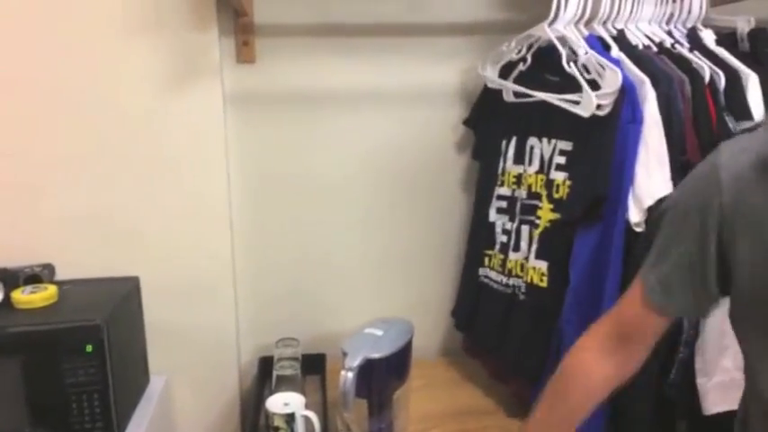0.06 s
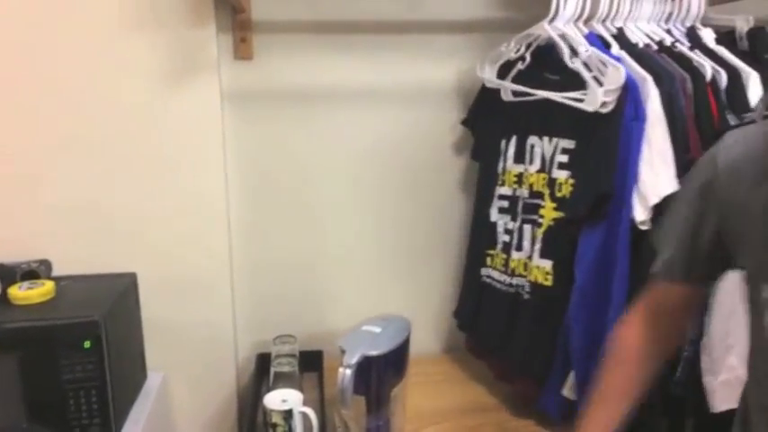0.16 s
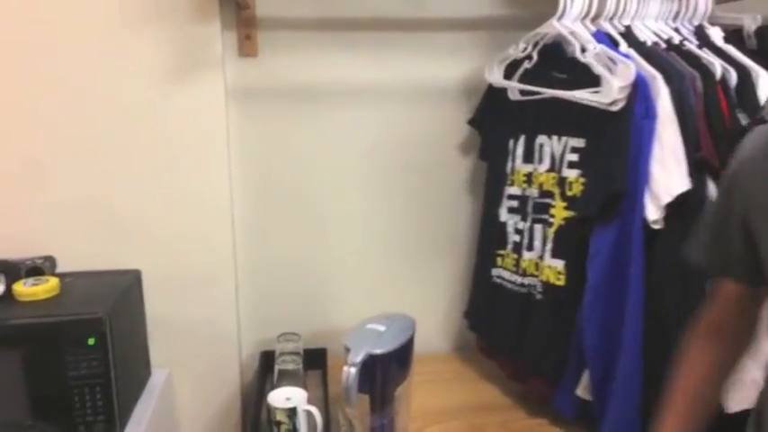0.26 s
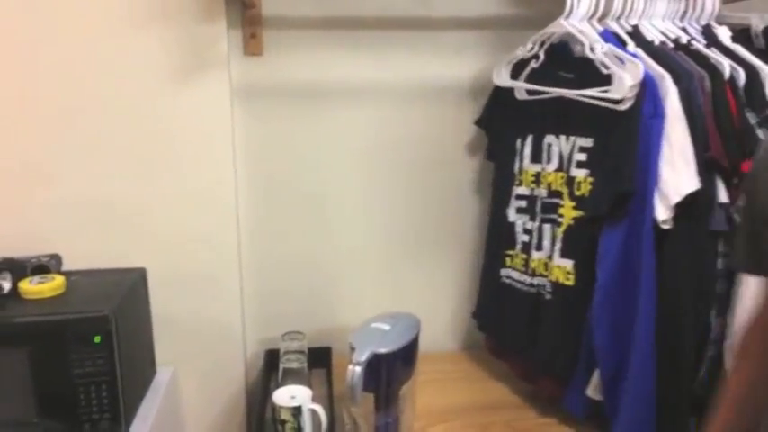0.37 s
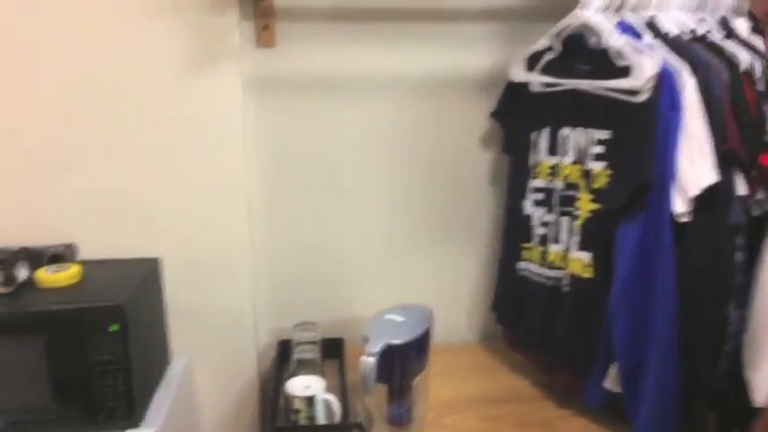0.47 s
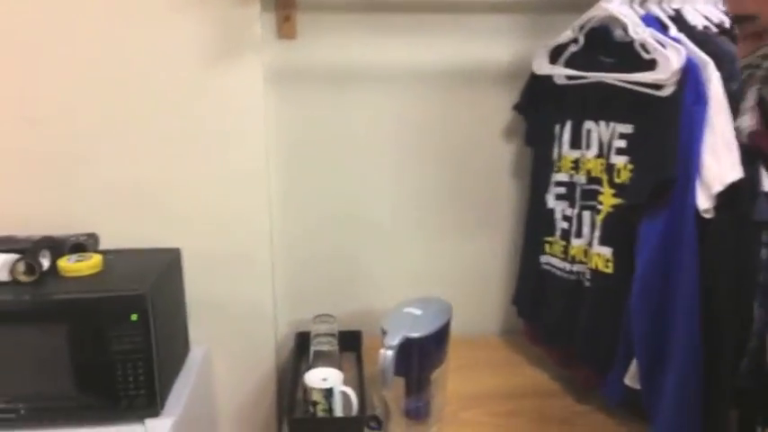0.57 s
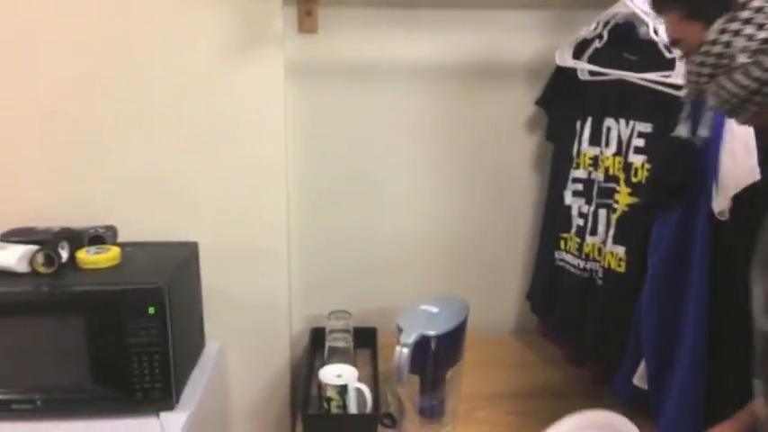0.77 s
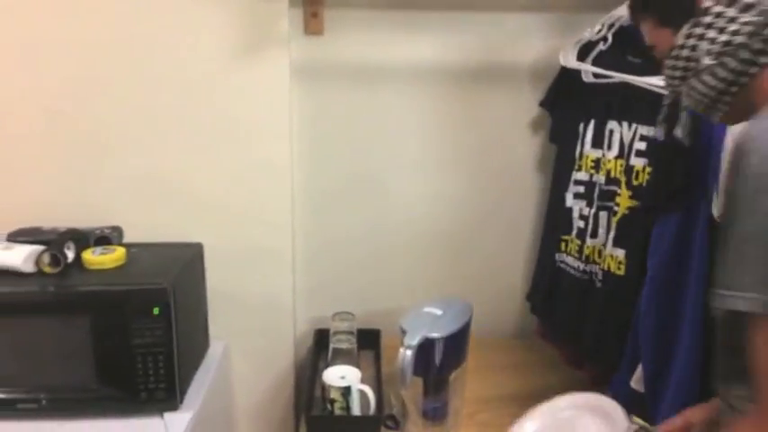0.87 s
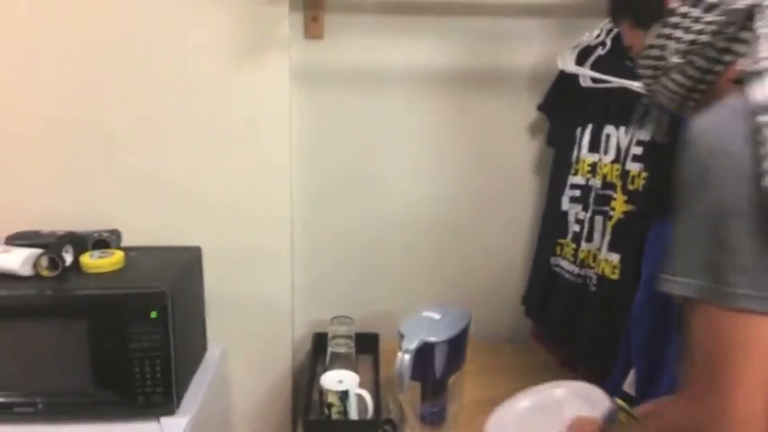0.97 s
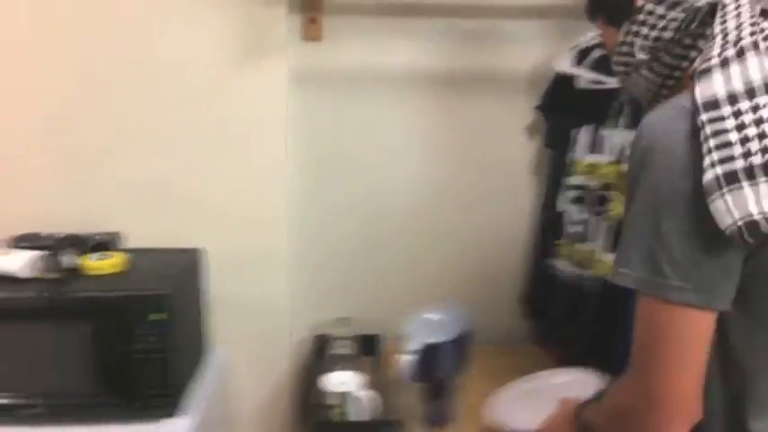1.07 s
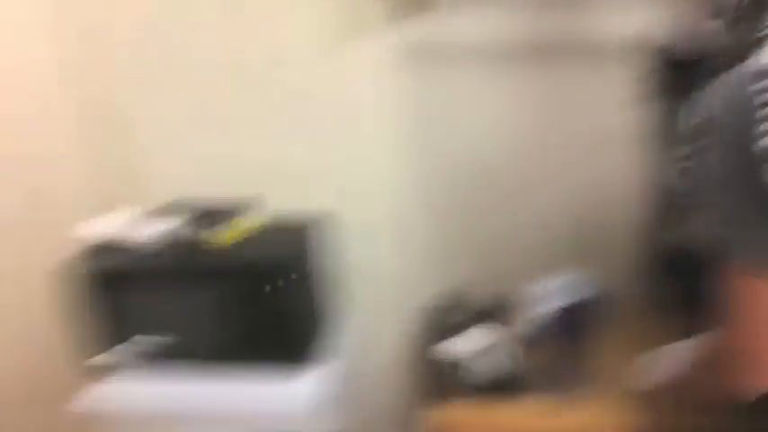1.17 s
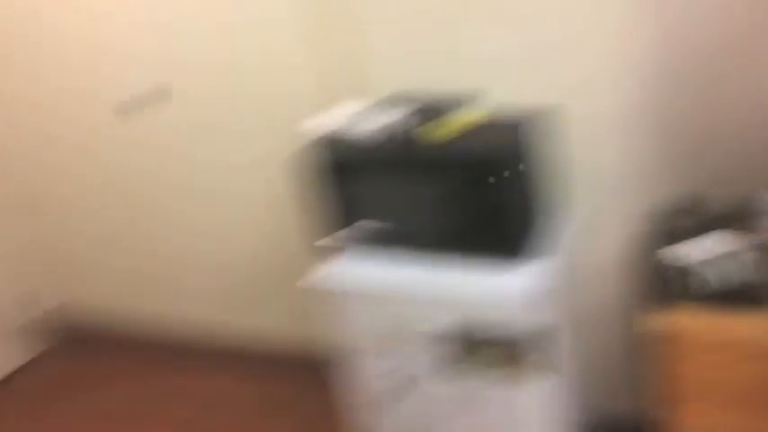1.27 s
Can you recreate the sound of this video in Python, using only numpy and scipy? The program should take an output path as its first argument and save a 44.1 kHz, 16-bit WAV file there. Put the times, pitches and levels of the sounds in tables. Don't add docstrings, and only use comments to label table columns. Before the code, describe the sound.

A sharp hanger clack with ringing plastic, a short pause, then a second clatter with heavy wooden knocks, and a few faint taps and scrapes; lively small room with low building hum, mono, loud peaks slightly rounded.

```python
import sys
import numpy as np
from scipy import signal
from scipy.fft import rfft, irfft
from scipy.io import wavfile
from scipy.ndimage import uniform_filter1d

SR = 44100
rng = np.random.default_rng(int(sys.argv[2]) if len(sys.argv) > 2 else 0)


def master_out(mix):
    frames = np.transpose(np.atleast_2d(mix))
    ceiling = np.clip(frames, -1, 1)
    pcm = np.round(ceiling * 32767).astype(np.int16)
    wavfile.write(sys.argv[1], SR, pcm)


def invert_db(x):
    u = np.asarray(x, float) / 20
    return 10 ** u


N = 57330
LEAD_S = 0.2


def rms_one(x):
    return x / np.sqrt(np.mean(x ** 2) + 1e-20)


def slow_noise(shape):
    once = uniform_filter1d(rng.standard_normal(shape), size=900)
    return rms_one(uniform_filter1d(once, size=900))


def at_hz(points, hz):
    table_hz, values = np.transpose(points)
    return np.interp(np.log(hz), np.log(table_hz), values)


def coloured(spectrum):
    hz = np.maximum(np.arange(N // 2 + 1) * SR / N, 10)
    below = 30 * np.minimum(np.log2(hz / spectrum[0][0]), 0)
    above = -18 * np.maximum(np.log2(hz / spectrum[-1][0]), 0)
    gain = invert_db(at_hz(spectrum, hz) + below + above)
    return rms_one(irfft(rfft(rng.standard_normal(N)) * gain, N))


def causal(shape_db, size=4096):
    hz = np.maximum(np.arange(size // 2 + 1) * SR / size, 10)
    cepstrum = irfft(np.log(invert_db(shape_db(hz))))
    cepstrum[1:size // 2] *= 2
    cepstrum[size // 2 + 1:] = 0
    click = irfft(np.exp(rfft(cepstrum)))[:size // 2]
    return click / np.sqrt(np.sum(click ** 2))


def place(parts):
    line = np.zeros(N + SR)
    for s, sound in parts:
        i = int((s + LEAD_S) * SR)
        line[i:i + len(sound)] += sound
    return line


def room(x, wet_db):
    # (frequency [Hz], time [s])
    decay_times = [(80, 0.23), (250, 0.44), (600, 0.61), (1200, 0.43), (2500, 0.31), (5500, 0.3),
                   (10000, 0.27), (15000, .22)]
    build_up_s = 0.0029
    late_db, late_stretch, late_tilt_db = -16, 3.09, -5
    t = np.arange(SR) / SR
    edges = 40 * 2 ** np.arange(0, 9, 0.5)
    white = rng.standard_normal((2, SR))
    tail = 0
    for k, (low, high) in enumerate(zip(edges, edges[1:].tolist() + [20000])):
        band_filter = signal.butter(2, [low, high], "band", fs=SR, output="sos")
        band = signal.sosfilt(band_filter, white[k % 2])
        fall_db = -60 * t / at_hz(decay_times, low * 2 ** 0.25)
        tilt_db = late_tilt_db * max(np.log2(low / 5000), 0)
        late = invert_db(late_db + tilt_db + fall_db / late_stretch)
        tail = tail + band * (invert_db(fall_db) + late)
    build_up = 1 - np.exp(-t / build_up_s)
    tail = tail * build_up * invert_db(wet_db) / np.sqrt(SR / 20)
    echoes = signal.fftconvolve(x, tail)[:len(x)]
    start = int(LEAD_S * SR)
    return (x + echoes)[start:start + N]


def hum():
    # (frequency [Hz], level [dB per Hz])
    rumble = [(30, -32), (55, -4), (72, 2), (110, -7), (160, -9), (240, -4), (330, -12.5), (450, -30)]
    # (time [s], level [dB])
    rumble_level = [(0, -45.5), (0.088, -45.5), (.18, -47.5), (0.299, -54.5), (0.551, -54), (.85, -49),
                    (1.061, -46.5), (1.13, -48.5), (1.3, -46.5)]
    # (frequency [Hz], level [dB per Hz])
    air_colour = [(250, -4), (500, 2.5), (1300, 1.5), (2500, -6.5), (4000, -9), (6000, -19), (10000, -30),
                  (16000, -18)]
    flicker_db, air_db = 2.6, -61
    air_follows = 0.89
    waver = slow_noise(N)
    level_db = np.interp(np.arange(N) / SR, *np.transpose(rumble_level))
    swing_db = level_db - level_db.mean()
    air = invert_db(air_db + air_follows * swing_db) * coloured(air_colour)
    return invert_db(level_db + flicker_db * waver) * coloured(rumble) + air


def contact_runs(rows, resonance_db, width, wet_db):
    # (frequency [Hz], level [dB per Hz])
    plastic = [(150, -53), (600, -26.5), (1500, -17), (3000, -10), (4200, -8.5), (5700, -5.5),
               (11000, -5.5), (15200, -11.5)]
    contacts_per_s, spread_db, run_fall_db = 9000, 2.5, 3.5
    swell_share = 0.12
    draws = rng.random((len(rows), 3, 3000))
    parts = []
    for (s, db, length, hz, tilt), (hit, size, sign) in zip(rows, draws):
        t = np.arange(len(hit)) / SR
        contact = (hit < contacts_per_s / SR) | (t == 0)
        strength = invert_db(-spread_db * np.log(size + 0.059))
        run = contact * np.sign(sign - 0.5) * strength * invert_db(-run_fall_db * t / length)
        ending = np.clip((length - t) * SR, 0, 1)
        rise = np.clip(0.56 + t / (swell_share * length), 0, 1)
        run = run * ending * rise
        run = run * np.sqrt(length * SR / np.sum(run ** 2))

        def colour_db(f):
            bump = resonance_db / (1 + (np.log(f / hz) / width) ** 2)
            return at_hz(plastic, f) + tilt * np.log2(f / hz) + bump

        body = causal(colour_db)[:1024]
        parts.append((s, invert_db(db) * np.convolve(run, body)))
    return sum(room(place(parts[k::3]), wet_db) for k in range(min(3, len(rows))))


def hanger_clacks():
    # (time [s], level [dB], length of the run [s], hanger resonance [Hz], tilt [dB per octave])
    blows = [(-.09, -48, 0.019, 6950, 3), (.166, -53.5, 0.028, 3500, -9.5), (0.196, -58.5, 0.013, 5960, 5),
             (0.2166, -12.5, 0.0079, 8800, -0.97), (.229, -22, 0.045, 11060, 0.9),
             (.292, -36.5, 0.0013, 6600, -8.5), (.310, -30, 0.021, 5760, 2),
             (.327, -37.5, 0.0092, 5360, -6), (.332, -23.5, .012, 9100, 4),
             (0.5892, -34.5, 0.0099, 7060, -3.8), (.595, -24, 0.013, 11400, 2.9),
             (0.613, -37, 0.03, 8740, -8.5), (.627, -24.5, 0.0057, 8950, -3.2),
             (.645, -30, 0.044, 10000, -3.6), (.738, -31, .006, 11200, -5), (.762, -38, 0.0084, 5740, -7.5),
             (0.9313, -38.5, .016, 8100, 2.5), (.943, -34.5, 0.0034, 10000, -0.5),
             (1.022, -45.5, .02, 4220, -3.5)]
    return contact_runs(blows, resonance_db=6, width=0.1, wet_db=6)


def light_touches():
    # (time [s], level [dB], length of the run [s], hanger resonance [Hz], tilt [dB per octave])
    touches = [
        (.203, -51, 0.015, 2650, -7.5),
        (.3245, -27, 0.01, 3060, -1.5),
        (0.85, -47, 0.013, 3930, -0.5),
        (.877, -45, 0.0018, 5170, 1),
        (.893, -47.5, 0.011, 6300, 2),
        (.965, -41.5, 0.043, 5500, 5),
        (1.0185, -41, 0.029, 6850, -1.3),
        (.232, -20, 0.026, 5820, 0.1),
        (.6235, -37, 0.00078, 5200, -5),
        (.6268, -23.5, .003, 6000, 2.3),
    ]
    return contact_runs(touches, resonance_db=15.5, width=0.17, wet_db=6)


def shelf_knocks():
    # (time [s], level [dB], contact cut-off [Hz])
    blows = [(.6340, -2.5, 6250), (0.6361, -2, 3500), (.643, -11.5, 1670), (.652, -7.5, 1430),
             (.664, -1, 1110), (0.6777, -10, 1200), (.70, -10, 696), (0.719, -11.5, 900),
             (0.325, -28.5, 1200), (.340, -28.5, 384), (0.2176, -29, 2000), (.244, -32, 1600)]
    # (frequency [Hz], level [dB per Hz])
    wood = [(50, -23), (110, -4.5), (450, -8.5), (770, -10.5), (1000, -1.5), (2000, -2.5), (2700, -11),
            (5000, -15.5)]
    # (frequency [Hz], level [dB], time to fall by 60 dB [s])
    modes = [(118, -8, .12), (229.7, 0.5, .35), (364.7, 0.5, 0.13), (449.6, -7.5, 0.65), (570, -19.5, 1.14),
             (594.4, -20.5, 1.34), (703.5, -10, 0.37), (900, -6.5, 0.31), (949, -22.5, 1.58),
             (1151, -1, 0.35), (1312.5, 6, 0.071), (1528, -10.5, .5), (1781, 5, 0.092), (2097, 9.5, 0.14)]
    shelf_db, wobble_db, chance_spread_db = -17.5, 4, 2.83
    swell_cycles, low_cut_hz = 8, 27
    t = np.arange(int(0.7 * SR)) / SR
    chances = rng.normal(0, chance_spread_db, (len(blows), len(modes)))
    wobble = invert_db(wobble_db * slow_noise((len(modes), len(t))))
    pulses, rings = [], []
    for (s, db, hz), own in zip(blows, chances):

        def soft(f):
            return -20 * np.log10(1 + (f / hz) ** 2)

        pulse = causal(lambda f: at_hz(wood, f) + soft(f))
        pulses.append((s, -invert_db(db) * pulse / np.abs(pulse).max()))
        for (f, mode_db, t60), chance_db, waver in zip(modes, own, wobble):
            swell = 1 - np.exp(-t * f / swell_cycles)
            envelope = swell * invert_db(-60 * t / t60) * waver
            level = invert_db(db + shelf_db + mode_db + chance_db + soft(f))
            rings.append((s, level * envelope * np.sin(2 * np.pi * f * t)))
    both = room(place(pulses), wet_db=2.5) + room(place(rings), wet_db=-12.5)
    return signal.sosfilt(signal.butter(2, low_cut_hz, "high", fs=SR, output="sos"), both)


def close_tick():
    tick = (1.2666, -52, 0.004, 10000, 4.1)
    return contact_runs([tick], resonance_db=6, width=0.25, wet_db=-1.5)


def scene():
    hangers = hanger_clacks() + light_touches()
    mix = hum() + hangers + shelf_knocks() + close_tick()
    return mix[None]


def band_limit(x):
    return signal.sosfilt(signal.butter(12, 16340, fs=SR, output="sos"), x)


def record(dry):
    top = 1.1
    cutoff_hz = 15250
    rounded = top * np.tanh(dry / top)
    treble_cut = signal.ellip(10, 0.5, 55, cutoff_hz, fs=SR, output="sos")
    mix = signal.sosfilt(treble_cut, rounded)
    return band_limit(mix)


dry = scene()
out = record(dry)
master_out(out)
```